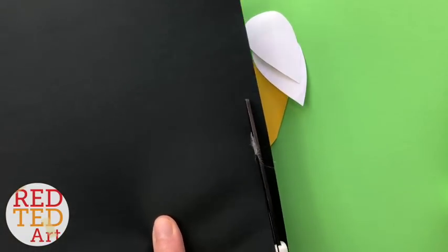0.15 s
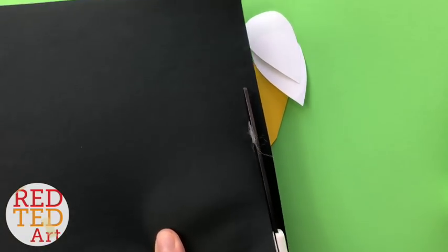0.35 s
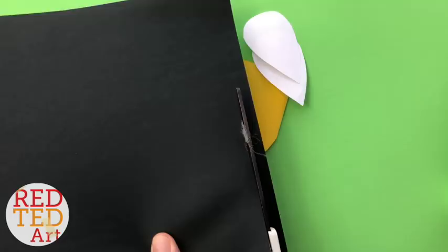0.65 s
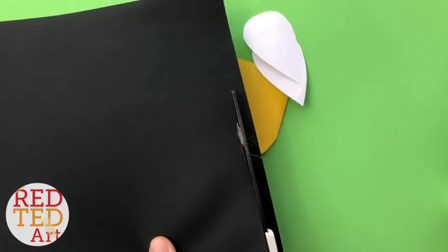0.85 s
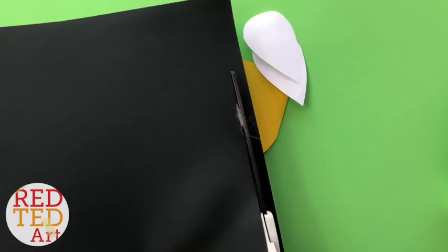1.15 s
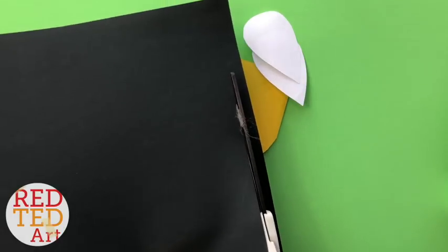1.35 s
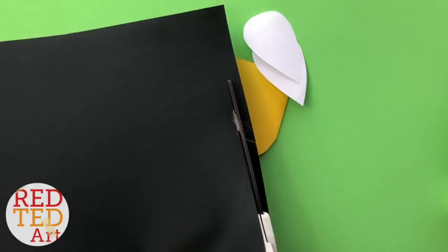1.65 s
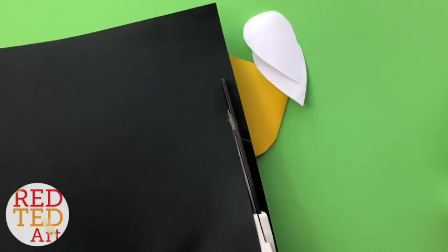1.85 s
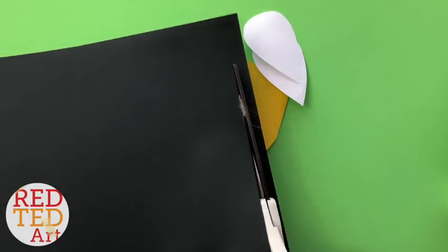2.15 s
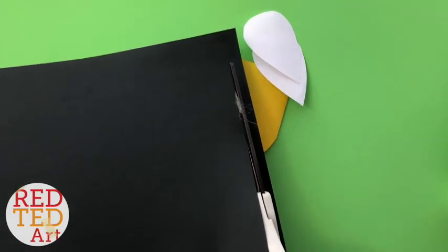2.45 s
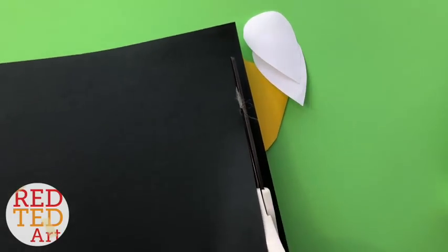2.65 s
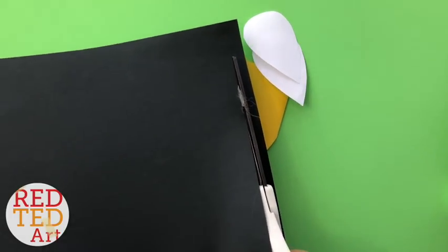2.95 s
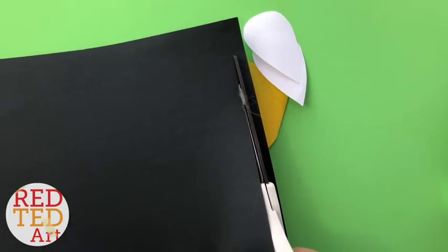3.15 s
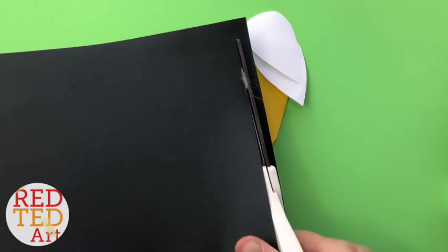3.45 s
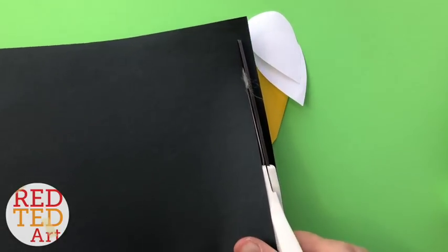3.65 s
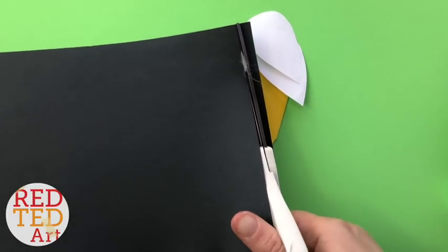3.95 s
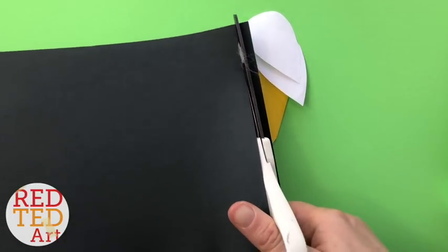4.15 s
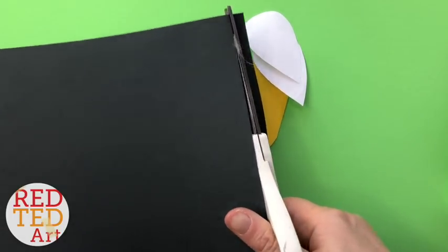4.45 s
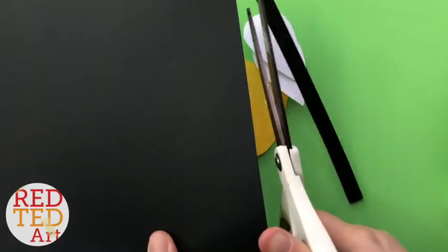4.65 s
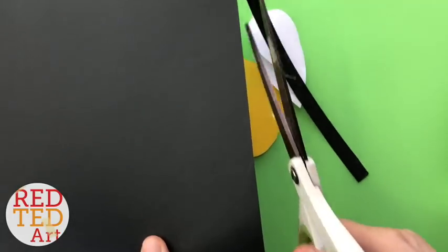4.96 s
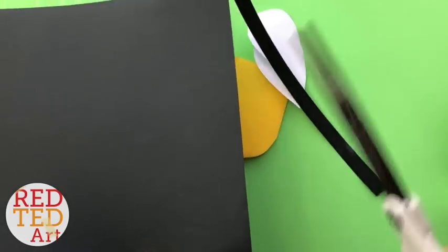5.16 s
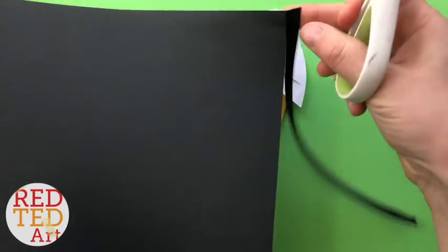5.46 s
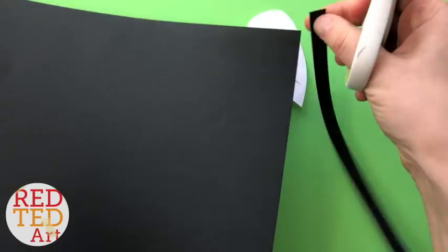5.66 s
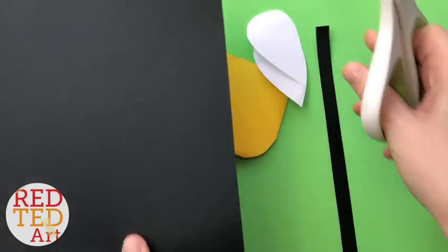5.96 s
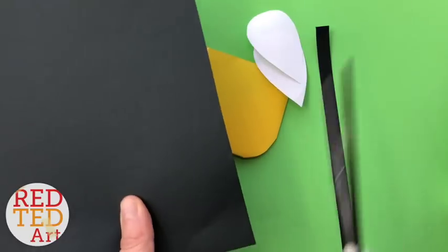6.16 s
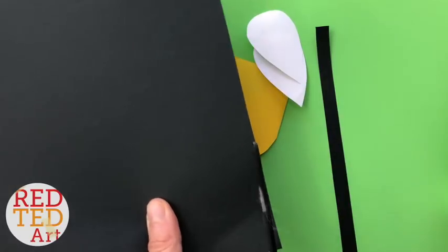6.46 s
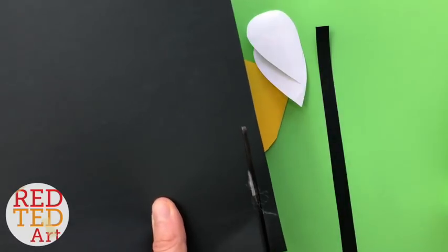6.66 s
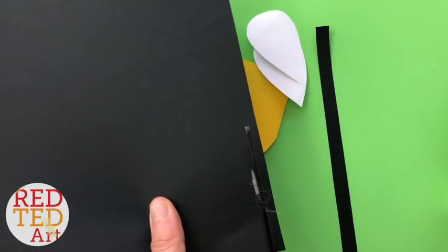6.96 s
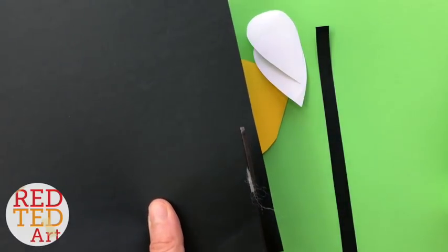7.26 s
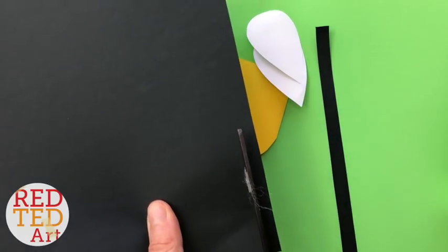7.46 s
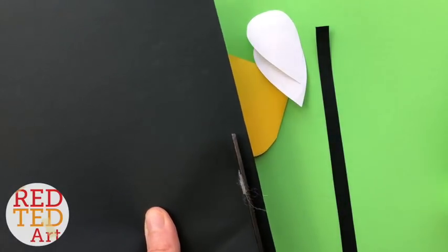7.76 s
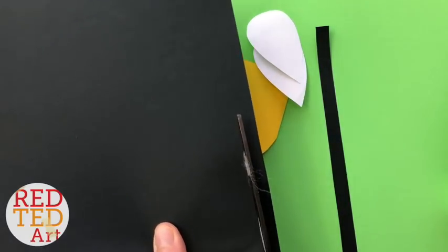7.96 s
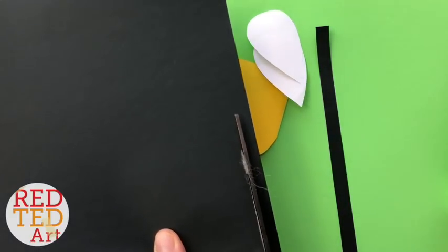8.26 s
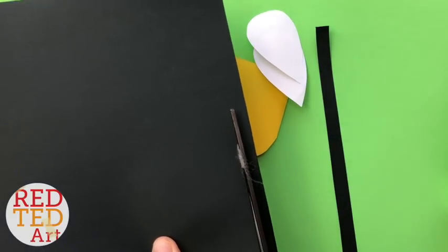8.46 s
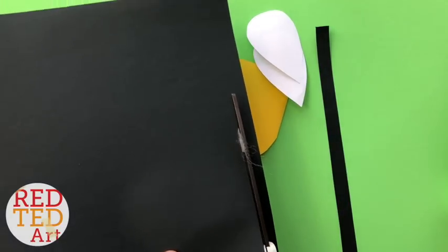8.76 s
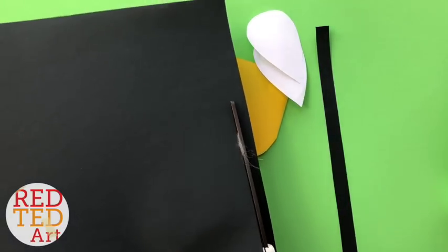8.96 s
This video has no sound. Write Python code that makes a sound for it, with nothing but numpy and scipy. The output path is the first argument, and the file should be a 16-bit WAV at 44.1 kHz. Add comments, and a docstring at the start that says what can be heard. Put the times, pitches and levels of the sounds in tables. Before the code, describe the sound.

Scissors crunch through thick paper in short close strokes, with sharp snaps and soft table bumps, a brief pause, then more cutting.

```python
"""Scissors creep through a sheet of thick paper in short strokes, close to a microphone, over a small room's hush.
Fibres tear in dense random clumps, which are filtered to sound like the sheet, the blades and the air.
Soft bumps on the craft table, sharp snaps and ticks stand out; the moving sheet adds a low rumble.
Random echoes that die away make the small room."""
import sys
import numpy as np
from scipy import signal
from scipy.io import wavfile
from scipy.ndimage import uniform_filter1d

SR = 44100
rng = np.random.default_rng(int(sys.argv[2]) if len(sys.argv) > 2 else 0)


def wav_out(sig):
    """Save sig, one row per channel (or a flat mono array), as 16-bit PCM at SR to the path in sys.argv[1]."""
    wavfile.write(sys.argv[1], SR, np.round(np.clip(np.atleast_2d(sig).T, -1, 1) * 32767).astype(np.int16))


N = 401751  # length in samples

# Tone of the sheet. Each row: frequency as a share of the sheet pitch, relative level in dB per Hz.
SHEET_BODY = [(0.147, -13.5), (.4, -19), (.58, -9), (.75, -2), (1.3, -4), (1.65, -13), (2.2, -17),
              (4.2, -36.5)]
# Airy top of the tearing. Each row: frequency in Hz, relative level in dB per Hz.
FIZZ = [(7000, 6.5), (9000, 0.5), (12500, -2.5), (16500, -1)]
# Low noise of the moving sheet and the table. Each row: frequency in Hz, relative level in dB per Hz.
RUMBLE = [(25, -6), (50, -1.5), (140, 6.5), (450, 1), (700, -32)]

FRAME, HOP = 512, 128  # samples in a short slice of sound, and from one slice to the next


def gain_of(db):
    """Turns decibels into a factor."""
    return 10 ** (np.asarray(db) / 20)


def evened(x):
    """Scales to an average strength (rms) of 1."""
    return x / np.sqrt(np.mean(x ** 2) + 1e-20)


def read(points, hz):
    """Reads a spectrum in dB between its points on a log-frequency axis; it falls steeply outside them."""
    f, db = np.transpose(points)
    octaves_above = np.maximum(np.log2((hz + 1e-9) / f[-1]), 0)
    octaves_below = np.maximum(np.log2(f[0] / (hz + 1e-9)), 0)
    inside_db = np.interp(np.log(hz + 1e-9), np.log(f), db)
    return np.maximum(inside_db - 48 * (octaves_above + octaves_below), -80)


def colour(points):
    """Makes a filter of energy 1 with the given spectrum that reacts only after it is struck."""
    hz = abs(np.fft.fftfreq(8192, 1 / SR))
    log_gain = np.log(gain_of(read(points, hz)))
    # the Hilbert transform finds the timing that puts the energy as early as possible
    taps = np.fft.ifft(np.exp(np.conj(signal.hilbert(log_gain)))).real[:4096]
    return taps / np.linalg.norm(taps)


def through(x, taps):
    """Filters a sound and cuts it to the scene's length."""
    return signal.oaconvolve(x, taps)[:N]


def wander(ms):
    """Random drift of spread 1 that changes over the given time."""
    size = max(int(ms * SR / 1000), 2)
    smoothed = uniform_filter1d(rng.standard_normal(N), size)
    return evened(uniform_filter1d(smoothed, size))


def room_hush():
    """Steady noise, filtered into the hush of a small room."""
    # Each row: frequency in Hz, relative level in dB per Hz.
    hush_tone = [(50, 15.5), (300, 9), (1000, 3), (2500, -7), (4300, -6.5), (16500, -13.5)]
    return gain_of(-56) * through(rng.standard_normal(N), colour(hush_tone))


def gestures():
    """The hand's effort in dB, the stroke in front at each moment, and the tone settings of every stroke."""
    # The blades bite, shear along and let go. Each row: start in seconds, length in seconds, effort in dB,
    # drift over the length in dB, time to fade 20 dB in ms, sheet level in dB relative to the effort,
    # fizz in dB relative to the effort, sheet pitch in Hz, bright band pitch in Hz.
    cuts = [(0.018, 0.063, -31, -7.5, 0.5, -1.15, -10.5, 1062, 6000),
            (0.16, 0.16, -33.5, -5, 69, 1.5, -12.5, 932, 3920),
            (0.363, 0.028, -44, 8, 31, 5, -15, 970, 3860), (0.431, 0.054, -49.5, 4, 36, 7.5, -8, 943, 3950),
            (0.567, 0.0094, -48, 9, 1.5, 10.5, -9, 990, 3760),
            (0.673, 0.22, -41, -5.5, 20, 4.5, -7.5, 1236, 4300),
            (0.9868, 0.18, -33.5, 1, 31, 3, -12, 950, 3980),
            (1.442, 0.16, -40.5, -0.5, 73.5, 2, -12, 1200, 3920),
            (1.653, 0.066, -40, 3.5, 63, 2.5, -12.5, 1287, 4100),
            (1.941, 0.34, -43.5, 5, 60, 8, -8, 939, 4210), (2.143, 0.16, -38, 3.5, 23, 7.5, -11, 960, 4250),
            (2.327, 0.041, -43.5, 8.5, 42.5, 7.5, -13.5, 942, 4160),
            (2.433, 0.064, -45.5, 2, 117, 6.5, -13, 1040, 3820),
            (2.647, 0.09, -47, 2.5, 83, 7.5, -12.5, 900, 3830),
            (2.825, 0.032, -46, 8.5, 15, 8, -9.5, 1220, 4270),
            (2.955, 0.0212, -34.5, -8.5, 32, 11, -6.5, 1140, 4310),
            (3.034, 0.067, -34, -4.5, 50, 9.5, -5.5, 1286, 4510),
            (3.244, 0.15, -33.5, -1, 88.5, 4.5, -14, 1170, 4600),
            (3.592, 0.15, -35.5, -6, 60, 9, -8, 1235, 4520),
            (3.845, 0.27, -28, -8, 92, 1.5, -14, 1004, 4560),
            (4.209, 0.18, -32.5, -7, 93, 9.5, -10, 1228, 4400),
            (4.525, 0.053, -37.5, 8, 101, 0.5, -12, 925, 4300),
            (6.513, 0.13, -38, -2, 79.5, -5, -5.5, 710, 3340),
            (6.725, 0.039, -48, 2, 241.5, 2.5, -8, 730, 3130),
            (7.143, 0.313, -49.5, 9.5, 51, -2, -3.5, 799, 4440),
            (7.496, 0.24, -37.5, -1.5, 17.5, 0, -4.5, 928, 4037),
            (7.809, 0.1284, -39.5, 8, 136, -3, -6.5, 940, 4560),
            (8, 0.067, -52, 9.5, 76, -5, -6, 1130, 3940), (8.197, 0.0075, -42.5, 9, 25, -2, -4, 1110, 4350),
            (8.234, 0.13, -46.5, 9.5, 14.5, 3, -5, 1320, 4270),
            (8.469, 0.17, -36, 0.5, 178.5, -1, -13.5, 912, 4530),
            (8.825, 0.14, -39, 2.5, 2, 2.5, -5, 1190, 4300),
            (8.993, 0.0255, -45, -2, 150, -2, -9.5, 1140, 4280)]
    # The loose strip and the sheet brush over each other. Each row: loudest moment in seconds, effort in dB,
    # time to swell 20 dB in ms, time to fade 20 dB in ms, fizz in dB relative to the effort,
    # bright band pitch in Hz.
    slides = [(1.84, -49.5, 153.5, 199.5, -17, 4260), (3.501, -51.5, 141, 150.5, -5, 4450),
              (4.497, -35, 30, 97, -17.5, 4520), (4.765, -42, 71, 62.5, -0.5, 3520),
              (4.947, -43, 95, 62, 0.5, 2840), (5.08, -45.5, 30, 199.5, -2.5, 5570),
              (5.184, -40.5, 129, 110, -3.5, 5500), (5.432, -42.5, 379, 180, -5, 5440),
              (6.045, -47.5, 125, 317.5, -3.5, 4720)]
    bite_ms, lead_db, lead_ms = 4.8, -13, 69  # a quick bite after a faint slow lead-in; ms per 20 dB
    cut_band_db = 7
    slide_sheet_db, slide_sheet_hz, slide_band_db = -10, 980, 9.5
    rest_db = -69  # effort between strokes

    ms = 1000 * np.arange(N) / SR
    shapes = []
    for s, length, db, drift_db, fade_ms, *_ in cuts:
        since, hold = ms - 1000 * s, 1000 * length
        rise_db = np.maximum(20 * since / bite_ms, lead_db + 20 * since / lead_ms) * (since < 0)
        shear_db = drift_db * np.clip(since / hold, 0, 1)
        fade_db = 20 * np.maximum(since - hold, 0) / fade_ms
        shapes.append(db + rise_db + shear_db - fade_db)
    for s, db, swell_ms, fade_ms, *_ in slides:
        since = ms - 1000 * s
        shapes.append(db + 20 * np.minimum(since / swell_ms, -since / fade_ms))
    shapes = np.array(shapes, np.float32)
    power = gain_of(2 * rest_db) + gain_of(2 * np.maximum(shapes, -150)).sum(axis=0)
    tones = [(*row[5:], cut_band_db) for row in cuts]
    tones += [(slide_sheet_db, fizz, slide_sheet_hz, band_hz, slide_band_db) for *_, fizz, band_hz in slides]
    return 10 * np.log10(power), shapes.argmax(axis=0), np.transpose(tones)


def fibres(per_s, spread_db, level_db):
    """Fibres part at random moments, each a tiny click up or down; a few are large."""
    size = gain_of(spread_db * np.minimum(rng.exponential(1, N), 5))
    direction = rng.choice([-1., 1.], N)
    parts_now = rng.random(N) < per_s / SR
    return gain_of(level_db) * evened(size * direction * parts_now)


def shaped(force, db):
    """Colours a force by a spectrum that may change from slice to slice, evened to leave its level alone."""
    slices = signal.stft(force, nperseg=FRAME, noverlap=FRAME - HOP)[2]
    gain = gain_of(db)
    slices *= gain / np.sqrt(np.mean(gain ** 2, axis=0))
    return signal.istft(slices, nperseg=FRAME, noverlap=FRAME - HOP)[1][:N]


def strokes(effort_db, now, tones, patchy_db=2.1):
    """The edge sticks and slips: clumps of tearing drive sheet, blades and air, coloured anew in each stroke."""
    # Tone of the tearing at the blades. Each row: frequency in Hz, relative level in dB per Hz.
    tear = [(1300, -4), (2000, -4.5), (3400, -0.5), (5300, -3), (6000, -5.5), (8200, -28), (10000, -61.5)]
    # Bright bands of the tearing. Each row: multiple of the bright band pitch, width in Hz,
    # share of the stroke's bright band dB.
    bright_bands = [(1, 507, 1), (1.62, 598, 0.39), (2.45, 500, 0.5)]
    sheet_db, fizz_db, sheet_hz, band_hz, band_db = tones
    rumble_db = -17.5 + 0.58 * sheet_db  # the rumble follows the sheet level of the stroke
    hz = np.fft.rfftfreq(FRAME, 1 / SR)[:, None]
    frame = now[np.minimum(np.arange(-(-N // HOP) + 1) * HOP, N - 1)]  # stroke in front in each slice
    clumped_db = effort_db + 1.5 * wander(ms=11) + 2.0 * wander(ms=2)

    # every grip of the sheet favours other narrow bands, which drift as it bends
    grip = evened(uniform_filter1d(rng.standard_normal((len(sheet_db), len(hz))), size=3))[frame]
    bend = uniform_filter1d(rng.standard_normal(grip.shape), size=5)
    bend = evened(uniform_filter1d(bend, size=20, axis=0))
    grip_db = patchy_db * (grip + bend).T

    drift = wander(ms=90)[::HOP][np.minimum(np.arange(len(frame)), N // HOP)]
    drifting_hz = band_hz[frame] * (1 + .012 * drift)
    peaks = sum(share * np.exp(-((hz - k * drifting_hz) / width) ** 2) for k, width, share in bright_bands)
    bright_db = band_db[frame] * peaks

    sheet_force = fibres(3000, 1.43, clumped_db + sheet_db[now])
    sheet = shaped(sheet_force, read(SHEET_BODY, hz / sheet_hz[frame]) + grip_db)
    blades = shaped(fibres(5000, 1.48, clumped_db), read(tear, hz) + bright_db + grip_db)
    # a harder push tears brighter
    air_force = fibres(14000, 2.0, clumped_db + fizz_db[now] + 0.27 * (effort_db + 45.5))
    fizz = shaped(air_force, read(FIZZ, hz) + bright_db + grip_db)

    # the heavy sheet follows the hand sluggishly, in lumps
    push = uniform_filter1d(gain_of(np.maximum(effort_db, -55) + rumble_db[now]), size=2500)
    push = push * gain_of(3.5 * wander(ms=35))
    rumble = push * through(rng.standard_normal(N), colour(RUMBLE))
    return sheet + blades + fizz + rumble


def thumps():
    """The hand or the sheet bumps the table: a soft swell of dull rumble that dies away."""
    # Each row: start in seconds, level in dB before the swell curve.
    bumps = [(0.189, -32), (0.493, -39), (1.355, -29), (1.989, -34), (2.279, -23), (3.861, -31),
             (4.56, -29), (5.139, -30.5), (5.557, -37), (5.609, -42.5)]
    swell_ms, top_hz = 16.8, 260  # time to the loudest point; treble fades above top_hz
    t, push = np.arange(N) / SR, np.zeros(N)
    for s, db in bumps:
        u = np.clip(1000 * (t - s) / swell_ms, 0, 50)
        push += gain_of(db) * u * np.exp(-u)
    noise = through(rng.standard_normal(N), colour(RUMBLE))
    dull = signal.lfilter(*signal.butter(1, top_hz, fs=SR), noise)
    return push * evened(dull)


def sheet_knock(pitch_hz, ring_share=.35):
    """A blow on the sheet gives a broad thud at the pitch of its grip and a few ringing tones."""
    # Each row: frequency in Hz, relative level in dB, time to fade 60 dB in seconds.
    sheet_modes = [(775, -9, .15), (856, -1, .055), (1001, -3, .08), (1104, -6, .09), (1195, -6, .11)]
    t = np.arange(4096) / SR
    ring = sum(gain_of(db - 60 * t / t60) * np.sin(2 * np.pi * hz * t) for hz, db, t60 in sheet_modes)
    thud = colour([(share * pitch_hz, 1.09 * db) for share, db in SHEET_BODY])
    share = np.clip(ring_share, 0, 1)
    return np.sqrt(share) * ring / np.linalg.norm(ring) + np.sqrt(1 - share) * thud


def snaps(now, tones, fizz_lift_db=-1.0, sheet_slower=1.454, crack_ms=1.5):
    """A snap or tick strikes blades, sheet and air with a dying burst; the briefer, the more a clean crack."""
    # Each row: start in seconds, blow on the blades in dB, blow on the sheet in dB, time scale in ms.
    blows = [(0.5192, -37, -33.5, 4.7), (0.745, -12.5, -6.5, 1.903), (1.3556, -65.5, -11, 2.875),
             (1.391, -32, -36, 3), (1.4252, -28, -28, 2.8), (1.4421, -25, -36, 1.1),
             (1.4624, -22.5, -22, 6.8), (1.9163, -21, -27, 1.8), (1.9698, -15.5, -14.5, 5.4),
             (2.1833, -18, -16.5, 2.13), (2.4495, -25.5, -23.5, 2.03), (2.8774, -25.5, -18.5, 5.6),
             (2.911, -24, -22, 4.7), (2.9373, -22, -15, 2.56), (3.2206, -41, -31, 2.2),
             (3.56, -33, -21, 3.6), (3.5878, -23, -11, 1.36), (4.373, -12, -7.5, 3.4),
             (4.5385, -33.5, -22, 8.3), (4.5577, -10.5, -12, 7.6), (4.735, -33.5, -37, 7.2),
             (5.1225, -24.5, -23, 8.2), (5.136, -23, -21.5, 2.49), (5.509, -22, -31.5, 5),
             (5.5496, -29.5, -30, 5.3), (5.6726, -21, -22.5, 7.8), (5.6779, -4.5, -7, 1.04),
             (5.7794, -15.5, -40, 1.39), (5.844, -33.5, -51.5, 5.7), (6.1366, -24.5, -45, 6.3),
             (6.4916, -24, -37, 8.2), (7.942, -18, -21.5, 5.7), (7.9712, -22, -15.5, 2.3),
             (7.978, 0.5, -4, 1.45), (8.1749, -36.5, -38.5, 5.2), (8.3505, -17.5, -15.5, 2.7),
             (8.7893, -34, -23, 1.9), (8.8138, -33.5, -40.5, 0.73), (8.96, -16.5, -18, 5.2),
             (8.993, -8.5, -16.5, 3)]
    # Tone of the struck blades. Each row: frequency in Hz, relative level in dB per Hz.
    clack_tone = [(1500, -10), (2200, -1.5), (4400, 3), (5400, -2.5), (8200, -9.5)]
    out, t = np.zeros(N + 8192), np.arange(2048) / SR
    fizz_db, sheet_hz = tones[1], tones[2]
    clack, air = colour(clack_tone), colour(FIZZ[1:])
    bursts = rng.choice([-1., 1.], (len(blows), 3, 2048))
    for (s, blade_db, sheet_db, ms), burst in zip(blows, bursts):
        at = round(s * SR)
        # rows from here on: blades, sheet (slower), air (as fizzy as the stroke it falls in)
        u = 1000 * t / max(ms, .1) / np.array([[1], [sheet_slower], [1]])
        blow_db = [blade_db, sheet_db, blade_db + fizz_lift_db + fizz_db[now[at]]]
        slip = u * np.exp(1 - 2 * u)
        crack = np.exp(-(ms / crack_ms) ** 2)  # share of the energy in one clean click
        push = np.sqrt(1 - crack) * burst * slip
        push[range(len(slip)), slip.argmax(axis=1)] += np.sqrt(crack) * np.linalg.norm(slip, axis=1)
        bodies = [clack, sheet_knock(sheet_hz[now[at]]), air]
        sound = signal.fftconvolve(push * gain_of(blow_db)[:, None], bodies, axes=1).sum(axis=0)
        out[at:at + len(sound)] += sound
    return out[:N]


def room(x, t60=0.23, treble_hz=2500):
    """Dense random echoes, dulled, that fade 60 dB in t60 seconds."""
    t = np.arange(SR // 2) / SR
    taps = rng.standard_normal(len(t)) * (t > .004) * gain_of(-60 * t / t60)
    taps = signal.lfilter(*signal.butter(1, treble_hz, fs=SR), taps)
    return through(x, taps / np.linalg.norm(taps))


def scene():
    """Cutting, snaps and bumps with their echoes in the room, over its hush."""
    effort_db, now, tones = gestures()
    near = strokes(effort_db, now, tones) + snaps(now, tones) + thumps()
    return (near + gain_of(-17.0) * room(near) + room_hush())[None]


def record(dry):
    """The microphone drops the deepest bass, clips peaks beyond full scale and cuts the highest treble."""
    edge_hz = 15950
    thinned = signal.sosfilt(signal.butter(2, 45, "high", fs=SR, output="sos"), dry)
    clipped = np.clip(thinned, -1, 1)
    band_limit = signal.firwin(255, edge_hz, window=("kaiser", 7), fs=SR)
    return signal.oaconvolve(clipped, band_limit[None], "same")


dry = scene()
out = record(dry)
wav_out(out)
```